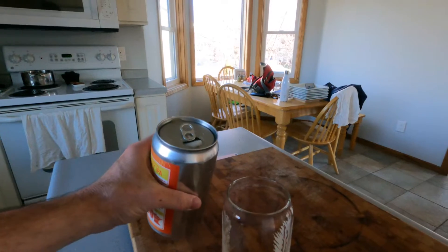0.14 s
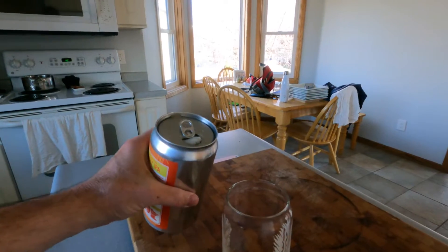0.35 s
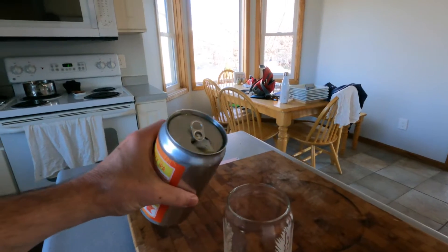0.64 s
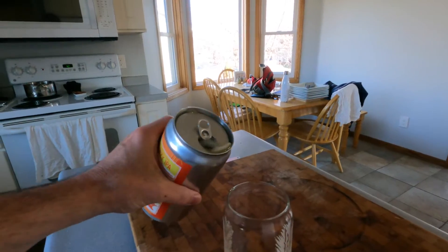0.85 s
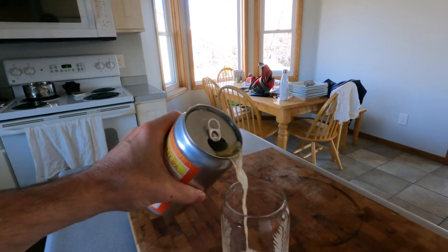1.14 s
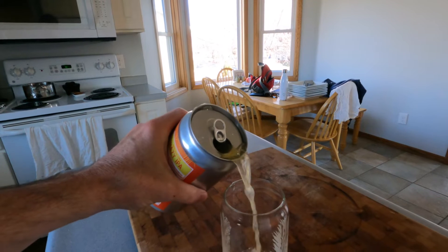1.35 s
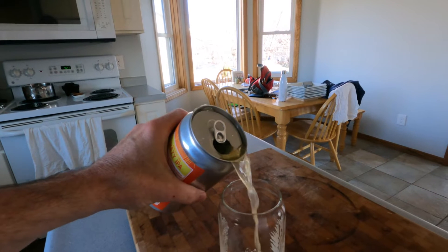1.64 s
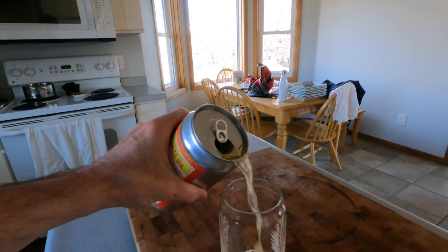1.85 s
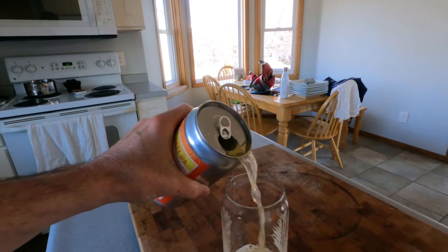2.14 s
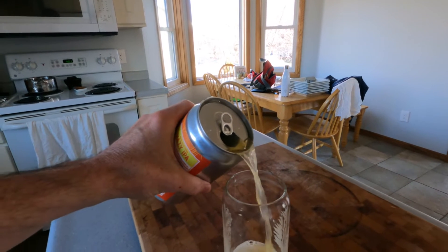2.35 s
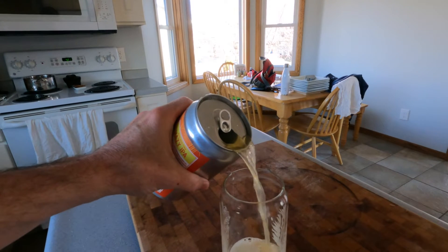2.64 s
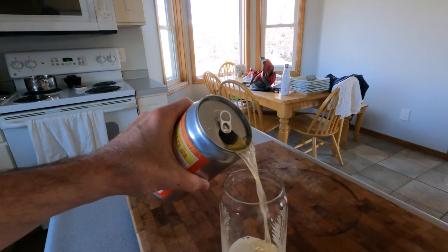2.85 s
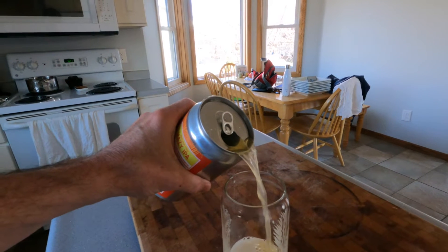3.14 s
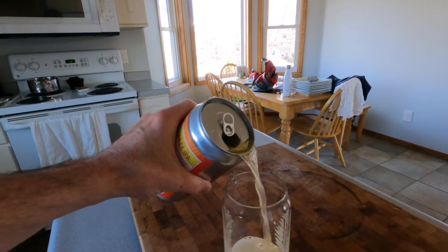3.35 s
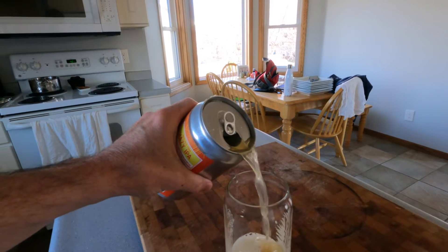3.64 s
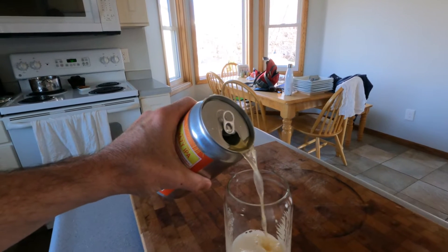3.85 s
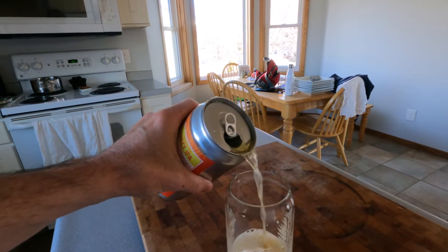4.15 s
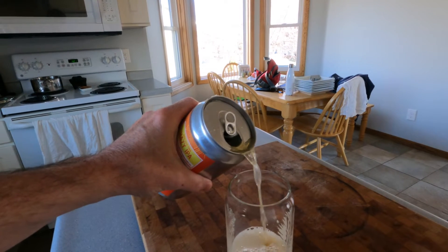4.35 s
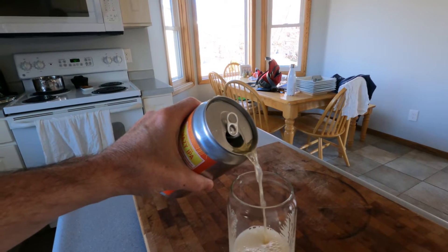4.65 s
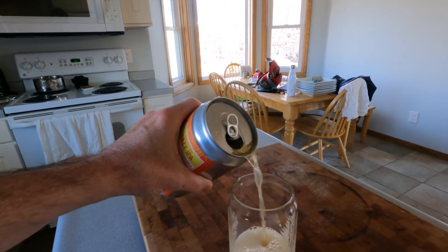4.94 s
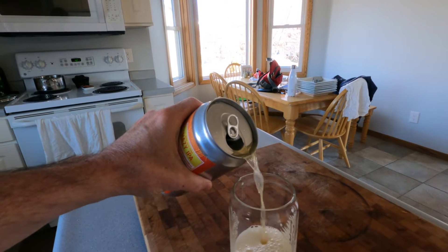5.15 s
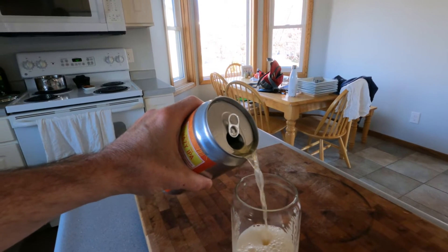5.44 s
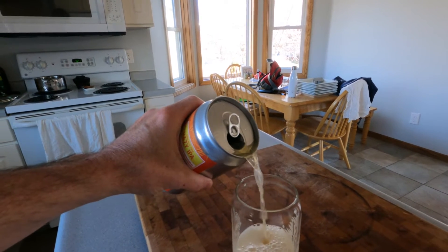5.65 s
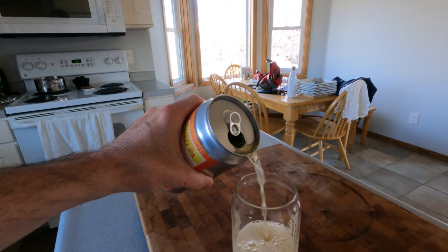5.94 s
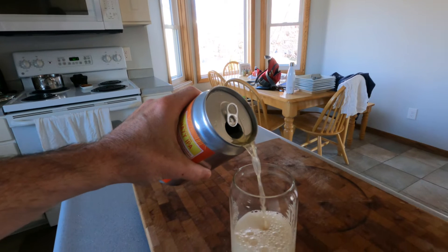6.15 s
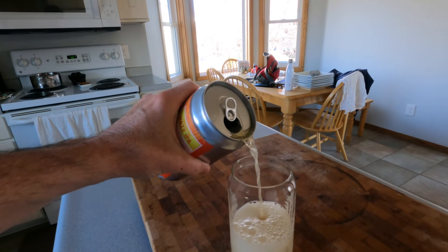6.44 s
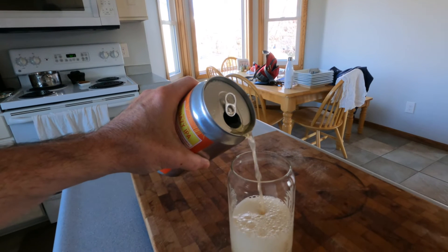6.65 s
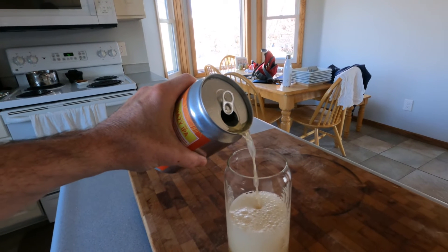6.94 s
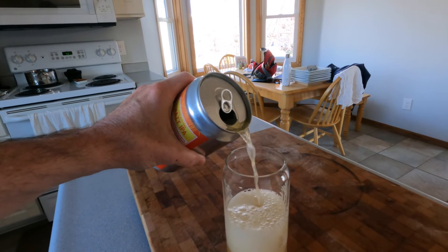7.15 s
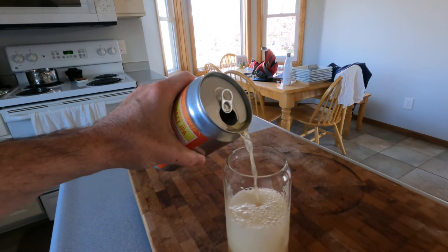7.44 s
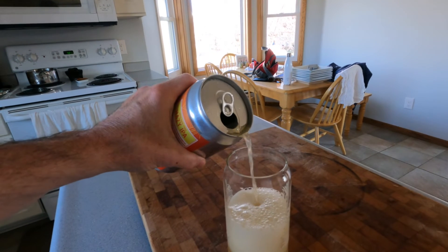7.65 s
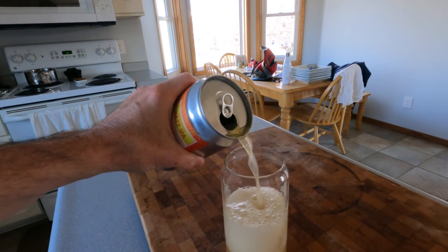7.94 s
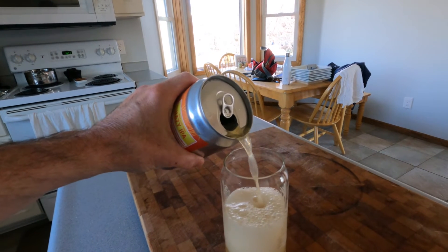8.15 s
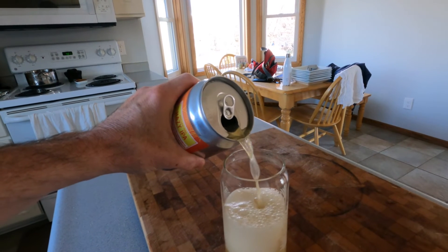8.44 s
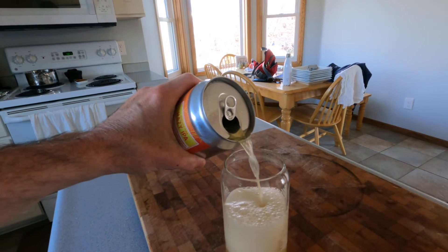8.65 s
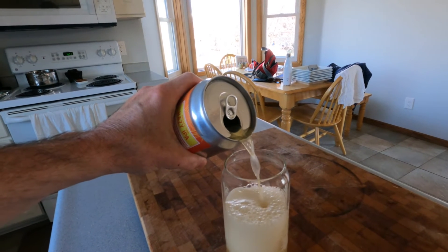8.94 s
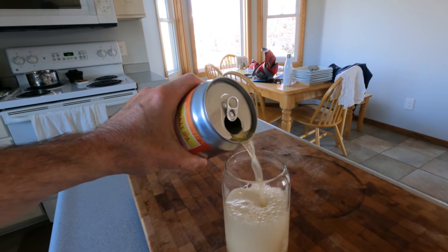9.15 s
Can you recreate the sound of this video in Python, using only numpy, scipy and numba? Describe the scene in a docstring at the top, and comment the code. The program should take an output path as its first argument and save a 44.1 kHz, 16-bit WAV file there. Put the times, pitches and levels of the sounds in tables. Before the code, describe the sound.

A quiet home kitchen, close microphone, with low wavering rumble and very faint hiss. Near 0.1 s there is a soft deep bump and a breathy wisp of hiss; at 0.3-0.65 s a thin, faint squeak glides downward. From about 1.2 s beer hits the empty glass in sharp, bright, separate splats with a glassy ring, strongest around 1.6-2.1 s. As liquid covers the bottom, the ring fades and round, hollow gulps join, dense from 2 to 3.8 s, the pool's tone sinking into a low gurgle. From 3 to 4.5 s foam grows and dulls the splashing into soft crackle and pops, while a hollow air resonance slowly rises. After 5 s it is a gentle, bubbly trickle; from 7 s it is very quiet, in sparse lumps with brief gaps near 7.9 and 8.8 s, still trickling faintly at 9.3 s. The stereo image gradually widens.

```python
"""Beer is poured from a can into a glass on a kitchen counter, close to the microphone.
Over a low room rumble come a deep bump, a soft hiss and a faint falling squeak; then splashes ring the bare glass.
Air gulps into a bubbly pool whose pitch sinks, while the shortening air column above it rises.
Foam then muffles the splash to soft pops, and the stream thins to sparse lumps.
Bubbles and gulps are damped tones, spray is decaying noise, pool and air are moving resonances fed by clicks."""
import sys
import numpy as np
from scipy import signal
from scipy.fft import rfft, irfft
from scipy.io import wavfile
from scipy.ndimage import uniform_filter1d
from numba import njit

SR = 44100
rng = np.random.default_rng(int(sys.argv[2]) if len(sys.argv) > 2 else 0)


def to_wav(sig):
    """Store sig (one row per channel, or 1-D mono) as 16-bit WAV at the path in sys.argv[1].

    Samples outside -1..1 are clipped; the rate is SR.
    """
    pcm = np.clip(np.atleast_2d(sig), -1, 1) * 32767
    pcm = np.round(pcm).astype(np.int16)
    wavfile.write(sys.argv[1], SR, pcm.T)  # frames by channels


N = 409248
TIME = np.arange(N) / SR

# force of the stream where it lands, before weighting by surface; a thick head swallows it: t/s, level/dB
POUR = [(1.15, -91), (1.25, -88), (1.5, -60), (1.62, -56.5), (2.0, -41.5), (2.4, -56), (3.0, -54),
        (3.2, -59), (3.75, -56.5), (4.05, -60.5), (4.6, -66), (6.3, -69.5), (6.84, -76.5), (6.93, -84),
        (7.02, -78.5), (7.78, -82.5), (7.86, -102), (7.95, -102), (8.02, -81.5), (8.72, -83), (8.79, -94),
        (8.88, -80.5), (9.28, -85.5)]
# lumps of beer that swell the stream, same weighting: t/s, level/dB
SURGES = [(3.27, -66), (4.4, -66.5), (5.1, -70.5), (5.831, -78), (7.075, -76.5), (7.39, -80.5),
          (7.535, -81.5), (7.7, -74), (8.16, -86), (8.427, -90), (8.681, -85.5), (9.229, -80.5)]
SURGE_S = 0.058  # a lump falls to 1/e this far from its centre
# splats of the stream on glass and open beer, before surface colour: t/s, level/dB, f/Hz, length/s
SPLATS = [(1.207, -48, 3530, 0.012), (1.225, -40, 5400, 0.013), (1.239, -22, 6240, 0.0038),
          (1.266, -31.5, 4370, 0.0055), (1.306, -25, 3680, .007), (1.33, -39, 4960, .015),
          (1.4235, -27, 6320, 0.01), (1.593, -30, 3560, 0.0055), (1.608, -20, 7200, .014),
          (1.624, -17.5, 3170, 0.0068), (1.68, -35, 4230, 0.0067), (1.694, -36, 4230, 0.0089),
          (1.737, -24, 8260, 0.015), (1.761, -24.5, 7750, 0.02), (1.807, -24.5, 3450, 0.0092),
          (1.817, -26, 4540, 0.013), (1.845, -43, 4300, 0.0097), (1.907, -24.5, 8080, .012),
          (1.946, -24, 1570, 0.011), (1.952, -27, 3280, 0.0085), (1.996, -22.5, 3040, 0.014),
          (2.063, -32, 3550, 0.0059), (2.071, -30, 1820, 0.011), (2.081, -16.5, 2600, .009),
          (2.099, -31, 2030, 0.034), (2.16, -35, 2060, 0.015), (2.225, -31, 3510, 0.011),
          (2.293, -31, 4460, 0.0099), (2.3835, -31.5, 3370, 0.012), (2.426, -60, 1870, 0.0087),
          (2.542, -33, 4370, 0.022), (2.628, -33, 3330, 0.011), (2.7, -36.5, 7460, 0.008),
          (2.701, -43, 1850, 0.0042), (2.78, -37, 4100, 0.0097), (2.814, -38.5, 1502, 0.015),
          (2.854, -33, 4330, 0.022), (2.9135, -31.5, 6350, 0.0045), (2.985, -24, 4900, 0.0066),
          (3.003, -36, 4400, 0.017), (3.018, -41, 1830, 0.0045), (3.135, -40.5, 7100, 0.0087),
          (3.286, -41, 3680, 0.0032), (3.386, -33.5, 8900, 0.0093), (3.46, -50, 3700, 0.0071),
          (3.5904, -37.5, 4300, 0.0073), (3.629, -32, 9300, 0.0031), (3.664, -31, 3550, 0.0059),
          (3.694, -29.5, 5330, 0.0097), (3.762, -27.5, 3670, 0.008), (3.898, -33, 3840, 0.0021),
          (4.274, -37.5, 4130, 0.0017)]
# pockets of air driven under: t/s, peak level/dB, f/Hz at the start of the ring
GULPS = [(1.305, -40, 3486), (1.528, -38.5, 1750), (1.593, -42.5, 1730), (1.624, -28, 1790),
         (1.724, -27, 1737), (1.741, -34.5, 1785), (1.913, -31.5, 1750), (1.987, -29, 1804),
         (2.038, -31, 1680), (2.083, -21, 1827), (2.12, -32.5, 1830), (2.18, -32.5, 963),
         (2.267, -19.5, 632), (2.298, -32, 627), (2.451, -28, 948), (2.499, -21.5, 688), (2.7, -35.5, 666),
         (2.727, -21.5, 730), (2.776, -31, 690), (2.808, -36.5, 643), (2.824, -32.5, 650),
         (2.885, -22.5, 661), (2.9125, -25.5, 637), (2.953, -34.5, 640), (3.012, -30, 630),
         (3.035, -23, 582), (3.095, -31.5, 646), (3.2385, -31.5, 610), (3.2575, -30, 590),
         (3.286, -30.5, 662), (3.318, -36.5, 624), (3.449, -30, 657), (3.469, -30.5, 670),
         (3.499, -21.5, 652), (3.561, -37.5, 353), (3.66, -30, 338), (3.699, -30, 656), (3.766, -29.5, 680),
         (3.774, -24, 325.6), (3.797, -23, 317), (3.844, -30, 688), (3.898, -32.5, 710),
         (4.012, -33.5, 301), (4.147, -28.5, 637), (4.216, -38, 720), (4.255, -35, 788),
         (4.297, -33.5, 240), (4.332, -30.5, 755), (4.3625, -39.5, 704), (4.443, -33.5, 750),
         (4.456, -41, 240), (4.777, -37, 736), (4.8, -42, 720), (4.819, -32, 240), (4.879, -31.5, 236.6),
         (5.05, -37, 744), (5.083, -36.5, 720), (5.119, -36, 225), (5.184, -37.5, 727), (5.212, -39, 224),
         (5.378, -41, 727), (5.476, -41, 233), (5.516, -35.5, 813), (5.593, -42, 226.4),
         (5.767, -42.5, 780), (5.806, -40, 806), (5.914, -41, 820), (5.972, -37.5, 844),
         (6.156, -35.5, 770), (6.212, -50, 830), (6.243, -38.5, 863), (6.313, -45, 820), (6.375, -45, 874),
         (6.579, -36, 845), (6.812, -45, 804), (6.835, -46, 900), (7.014, -49, 905), (7.065, -44.5, 900),
         (7.662, -41, 945), (7.695, -51, 985), (7.791, -46, 928), (8.118, -56, 930), (8.145, -47, 870),
         (8.17, -46.5, 890), (8.315, -52.5, 980), (8.415, -50, 920), (8.663, -60, 1046), (8.7, -59, 997),
         (8.871, -54.5, 995), (9.018, -51, 1040), (9.134, -52, 1000), (9.2135, -48, 1057),
         (9.239, -44, 985)]
# ring time nears the first value for small pockets; large, low ones add the second at the reference pitch
GULP_T60_S, GULP_RING_S, GULP_REF_HZ = 0.023, 0.022, 650
# pitch of the pool, which sinks as it deepens and fills with gas: t/s, f/Hz
POOL = [(1.5, 1800), (2.08, 1663), (2.17, 1032), (2.75, 758), (3.1, 620), (3.3, 477), (3.52, 339),
        (3.75, 324), (4.05, 311), (4.35, 254), (4.95, 241), (5.5, 223), (5.95, 158.7)]
# the largest bubbles bursting in the head, before click, spray and ring gains: t/s, level/dB
POPS = [(3.288, -33), (3.469, -30.5), (3.7983, -33), (3.9003, -29.5), (3.93, -37), (3.9569, -35),
        (3.9704, -36.5), (4.0044, -33), (4.1612, -35), (4.1819, -37.5), (4.2555, -31.5), (4.3345, -34.5),
        (4.4221, -28), (4.4425, -29.5), (4.5982, -45), (4.7142, -42), (4.762, -45), (4.8122, -44),
        (4.8192, -38), (4.925, -53), (5.021, -42), (5.0823, -45), (5.104, -43), (5.1845, -52.5),
        (5.3567, -46), (5.3792, -38), (5.4326, -42), (5.4705, -44), (5.498, -39.5), (5.5172, -41.5),
        (5.6374, -46.5), (5.688, -45), (5.7684, -41.5), (5.7928, -40), (5.8072, -39), (5.829, -34),
        (5.9727, -38), (6.0393, -42.5), (6.0686, -45), (6.1007, -42), (6.135, -42), (6.244, -41.5),
        (6.2653, -43), (6.4206, -46.5), (6.545, -44), (6.5693, -46.5), (6.7715, -49.5), (7.0606, -49),
        (7.0955, -47.5), (7.6638, -41.5), (7.6969, -43), (7.7204, -46), (7.7443, -45.5), (7.7922, -49.5),
        (9.214, -47), (9.24, -48)]
# ring of the empty glass, its air and its wall, relative to the send: f/Hz, level/dB, t60/s
GLASS = [(600, -19, .15), (990, -12, .15), (1745, 0, .21), (1870, -2, .17), (2960, 0, .16), (3200, -6, .12),
         (3470, 1, .22), (4290, -7, .12), (4610, -8, .1), (5340, -8, .13)]
# colour of the splash on bare glass, before a trim: f/Hz, level/dB
BARE = [(300, -21.5), (800, -10), (1050, 6.5), (1300, -15), (1800, -2.5), (2400, -12.5), (3300, 5),
        (3900, -8.5), (4500, 2.5), (6500, -0.5), (8100, -1.5), (9200, -24.5), (12700, -11.5), (16000, -31)]
# colour of the splash on open beer: f/Hz, level/dB
OPEN = [(250, -64), (700, 18), (1100, 20.5), (1330, 7.5), (1850, 20), (2600, 2), (3500, 4.5), (5000, 4.5),
        (6200, 2.5), (8000, 2), (9200, -11.5), (11000, -14.5), (12700, -8), (16000, -46.5)]
# colour of the splash on foam: f/Hz, level/dB
FOAM = [(250, -32.5), (500, 2.5), (1000, -14), (1350, 12), (1900, 13.5), (2550, -4), (2900, 8), (3700, 3),
        (5000, 1.5), (5900, -1), (7500, -3.5), (8700, -10), (10500, -10), (12500, -15.5), (16000, -60.5)]

# the stream lands on bare glass, then on open beer, then on foam
COVERED_S, COVERING_S = 1.897, 0.52  # beer starts to cover the bottom, and how long that takes
HEAD_S, HEAD_GROWS_S = 3.06, 1.42  # the head starts to grow, and how long that takes
FOAM_FIRST, FOAM_LAST = 0.054, 0.95  # share of the beer under foam before and after
CLOUDING_S = 0.96  # time the beer takes to cloud with gas
# the air above the beer is a quarter-wave pipe that shortens steadily from FILL_S on
AIR_M, FILL_S, RISE_M_PER_S, SOUND_M_PER_S = 0.1453, 1.97, 0.009, 343

# thin squeak that falls in pitch and dips once in level, before a gain: t/s, f/Hz, level/dB
SQUEAK = [(0.27, 3260, -105), (0.305, 3250, -90), (0.34, 3120, -77), (0.38, 2680, -93), (0.415, 2510, -69),
          (0.48, 2265, -72), (0.56, 2090, -75), (0.66, 2070, -100)]
# soft swells of hiss: t/s, level/dB, time to 1/e/s, centre f/Hz, width f/Hz
WISPS = [(0.025, -74.5, 0.52, 1190, 1400), (8.726, -79.5, 0.14, 4770, 2400)]
# level of the kitchen's low rumble, around which it wavers: t/s, level/dB
ROOM = [(0, -45.5), (0.7, -47.5), (1.12, -51), (1.24, -46), (1.42, -49), (1.75, -45.5), (2.2, -54.5),
        (4.3, -51.5), (4.95, -49), (5.35, -44.5), (6.4, -56), (7.9, -50), (8.3, -52), (9.28, -50)]
# colour of the low rumble: f/Hz, level/dB
RUMBLE = [(60, -34), (115, -23.5), (140, 2.5), (170, 0.5), (240, 0.5), (300, -5), (370, -10.5), (440, -25),
          (560, -29.5), (800, -69)]
# colour of the deep layer that carries the bumps: f/Hz, level/dB
DEEP = [(15, -4), (38, 4), (60, -7.5), (100, -7.5), (200, -29), (500, -107)]
# colour of the faint room hiss: f/Hz, level/dB
HISS = [(200, -8), (550, 3), (780, -1.5), (1100, 1.5), (1500, -2.5), (2200, -12), (3500, -17.5),
        (5200, -13.5), (7500, -16), (9000, -26.5), (12000, -53)]
# soft deep bumps as the microphone is moved: t/s, level/dB, time to 1/e/s
BUMPS = [(0.136, -47, 0.35), (1.71, -60, 0.36), (5.95, -54, 0.16)]

# colour of the opening stereo side: f/Hz, level/dB before the opening gain
WIDTH = [(50, -7), (200, -28), (480, -9), (750, -25), (1300, -12.5), (3000, -13), (7000, -2.5),
         (10000, -15.5)]
# the stereo side opens from near mono: t/s, level/dB
OPENING = [(2.05, -68), (2.6, -26), (3.4, -13.5), (4.8, -3.5), (9.28, 4.5)]
# colour of the stereo side in the top octaves, wide throughout: f/Hz, level/dB
SPARKLE = [(2500, -82.5), (4500, -40), (9500, -30), (12500, -2), (15000, 1)]
TOP_HZ = 15700  # upper edge of the recorder


def splash(bursts, bare_db=-1, glass_db=-48.0, bubble_db=1, clear_tick_db=-6,
           cluster_db=3, gas_damping=0.8, smother_db=-4):
    """Bubbles, ticks and splats, dulled as first beer and then foam covers the bottom."""
    bare, wet, foamy = surface()
    rate = 2100 * (1 - foamy) + 320 * foamy  # bubbles per second
    cluster = undb(cluster_db * walk(60))  # the stream breaks into lumps
    fizz = steady(cluster * bubbles(rate, 1100, 14000, cycles=10, spread_db=3.0), 0.15)
    ticks = steady(cluster * clicks(rate * 0.66, spread_db=8), 0.43)
    # bubbles ring in clear beer; clouded with gas they mostly tick, and foam smothers the ticks
    cloudy = ramp(COVERED_S, CLOUDING_S)
    ringing = fizz * undb(bubble_db) * (1 - gas_damping * cloudy)
    ticking = ticks * undb(clear_tick_db * (2.0 - cloudy) + smother_db * foamy)
    force = stream(bare_db=-7.5, open_db=-3.5, foam_db=3)
    drive = (ringing + ticking) * force + splats() + bursts
    out = through(drive * bare, undb(bare_db) * response(BARE)) + glass(drive, glass_db)
    out += through(drive * wet, response(OPEN))
    out += through(drive * foamy, response(FOAM))
    return out, drive


def splats(t60=0.12, spray_db=2, slap_db=5.0, cloud_db=5.5, cycles=24, rise=0.0009, scatter=0.18, count=18):
    """Each splat is a slap and a short spray, with a cloud of like-sized bubbles ringing in it."""
    out = np.zeros(N)
    for s, db, hz, length in SPLATS:
        spray = undb(spray_db) * puff(t60) + undb(slap_db) * puff(2 * length)
        onset = 1 - np.exp(-(TIME[:len(spray)] / rise) ** 2)
        add(out, s - rise, undb(db) * spray * onset)
        cloud = np.zeros(SR // 2)
        for when, detune in zip(rng.random(count), rng.standard_normal(count)):
            bubble = ping(hz * np.exp(scatter * detune), cycles / hz, rise)
            add(cloud, length * when ** 2, bubble / (1 + detune ** 2))  # crowded early, strongest in tune
        add(out, s - rise, undb(db + cloud_db) * cloud / np.linalg.norm(cloud))
    return out


def glass(x, db, vary_db=2):
    """The empty glass rings on; the landing spot wanders, so each hit favours other modes."""
    x = x * surface()[0]
    out = np.zeros(N)
    for hz, mode_db, t60 in GLASS:
        struck = x * undb(vary_db * walk(14))
        out += through(struck, undb(mode_db + db) * ping(hz, t60))
    return out


def gulps(pool_db=-9, pool_cycles=18, rise=0.0021, glide=0.22, column_db=-9, column_t60=0.038):
    """A trapped pocket of air rings at its own pitch and shakes the pool and the air above it."""
    out = np.zeros(N)
    for s, db, hz in GULPS:
        (pool_hz,), column_hz = curve(POOL, s), column_pitch(s)
        t60 = GULP_T60_S + GULP_RING_S * (GULP_REF_HZ / hz) ** 2
        y = ping(hz, t60, rise, glide)
        y += undb(pool_db) * ping(pool_hz, pool_cycles / pool_hz, rise)
        moved_air = min(column_hz / hz, 2)  # large pockets move more air
        y += undb(column_db) * moved_air * ping(column_hz, column_t60, rise)
        add(out, s, undb(db) * y / np.abs(y).max())
    return out


def gulp_spray(spray_db=-5.0, t60=0.0164):
    """Each pocket of air flicks up a little spray as it closes."""
    out = np.zeros(N)
    for s, db, _ in GULPS:
        add(out, s, undb(db + spray_db) * puff(t60))
    return out


def pool(wander=0.047, q=11, skirt_q=2.2):
    """The cloud of bubbles in the beer throbs as one soft, ringing spring; a shallow pool is shaken faster."""
    hz = curve(POOL)[0] * np.exp(wander * walk(30))
    body = cavity(clicks(0.15 * hz + 120, spread_db=4), hz, q, skirt_q)
    return steady(body, 0.097) * stream(bare_db=-13, open_db=0.5, foam_db=14)


def air_column(drive, pop_db=11, q=7.2, wander=0.038, cluster_db=1.85):
    """A dense run of plunging bubbles, and sound from the foam, ring the air above the heaving surface."""
    hz = column_pitch(TIME) * np.exp(wander * walk(40))
    plunges = steady(cavity(clicks(420, spread_db=5.0), hz, q, skirt_q=0.68), 0.1)
    plunges *= undb(cluster_db * walk(11))
    rung = cavity(drive, hz, q, skirt_q=1.6) * surface()[2]
    return plunges * stream(bare_db=-32.0, open_db=6, foam_db=11.5) + undb(pop_db) * rung


def column_pitch(t):
    """Quarter-wave pitch of the air left above the rising beer."""
    length = AIR_M - RISE_M_PER_S * np.maximum(t - FILL_S, 0)
    return SOUND_M_PER_S / 4 / length


def plinks(rate=850, cycles=26, spread_db=4.0):
    """Middling bubbles ring clearly in the shallow beer and weaken as the head covers them."""
    ringing = steady(bubbles(rate * np.ones(N), 1000, 3600, cycles, spread_db, count=8000), 0.25)
    return ringing * stream(bare_db=-13.5, open_db=-7, foam_db=-20.5)


def burble(rate=900, cycles=7, spread_db=5.5, cluster_db=2.5):
    """Under the head, damped bubbles churn in soft, uneven clusters."""
    churn = steady(bubbles(rate * np.ones(N), 900, 3100, cycles, spread_db, count=9000), 0.2)
    force = stream(bare_db=0.0, open_db=-10.0, foam_db=-8.5)
    return churn * undb(cluster_db * walk(15)) * surface()[2] * force


def prickle(rate=800, cycles=6, spread_db=7.0, cluster_db=3):
    """Small bubbles snap at the surface, each barely ringing but with a colour of its own."""
    snaps = steady(bubbles(rate * np.ones(N), 1500, 4800, cycles, spread_db, count=9000), 0.25)
    return snaps * undb(cluster_db * walk(25)) * stream(bare_db=-20, open_db=-9, foam_db=-3.5)


def pops(click_db=4.0, spray_db=2, spray_t60=0.02, rise=0.00082):
    """A foam bubble bursts: the film tears, snaps and leaves a wisp of spray."""
    out = np.zeros(N)
    for s, db in POPS:
        add(out, s, undb(db + click_db) * np.ones(1))  # one-sample snap
        add(out, s - rise, undb(db + spray_db) * puff(spray_t60))
    return out


def pop_rings(gain_db=-6, hz=3100, scatter=0.29, cycles=14, rise=0.00027, glide=25):
    """The opened bubble rings for a few cycles at its own pitch, rising as its mouth widens."""
    out = np.zeros(N)
    pitches = hz * np.exp(scatter * rng.standard_normal(len(POPS)))
    for (s, db), pitch in zip(POPS, pitches):
        add(out, s - rise, undb(db + gain_db) * ping(pitch, cycles / pitch, rise, glide))
    return out


def stream(bare_db, open_db, foam_db):
    """Force of the stream with its lumps, weighted by what it lands on."""
    bare, wet, foamy = surface()
    force = undb(curve(POUR)[0]) + sum(swell(s, db, SURGE_S) for s, db in SURGES)
    return force * undb(bare * bare_db + wet * open_db + foamy * foam_db)


def surface():
    """Shares of bare glass, open beer and foam under the stream."""
    pooled = ramp(COVERED_S, COVERING_S)
    head = FOAM_FIRST + (FOAM_LAST - FOAM_FIRST) * ramp(HEAD_S, HEAD_GROWS_S)
    foamy = pooled * np.clip(head, 0, 1)
    return 1 - pooled, pooled - foamy, foamy


def squeak(gain_db=-6, echo_db=1, t60=0.61, waver=0.0091):
    """A thin, gliding tone, blurred by the room."""
    hz, db = curve(SQUEAK)
    phase = 2 * np.pi * np.cumsum(hz * (1 + waver * walk(120))) / SR
    tone = undb(db + gain_db) * np.sin(phase)
    tone = tone * (TIME > SQUEAK[0][0]) * (TIME < SQUEAK[-1][0])
    return tone + undb(echo_db) * through(tone, puff(t60))


def wisps():
    """Narrow bands of hiss that swell and fade."""
    out = np.zeros(N)
    for s, db, length, hz, width in WISPS:
        band = cavity(rng.standard_normal(N), np.full(N, 1. * hz), hz / width, skirt_q=0.93)
        out += swell(s, db, length) * unit(band)
    return out


def kitchen(deep_db=-64, hiss_db=-75, waver_db=1.8):
    """Wavering low rumble and a few deep bumps under a faint hiss, all from coloured noise."""
    rumble, sub, hiss = (unit(through(rng.standard_normal(N), response(c))) for c in (RUMBLE, DEEP, HISS))
    low = undb(curve(ROOM)[0] + waver_db * walk(20))
    deep = undb(deep_db) + sum(swell(s, db, length) for s, db, length in BUMPS)
    return rumble * low + sub * deep + hiss * undb(hiss_db)


def bubbles(rate, lo_hz, hi_hz, cycles, spread_db, count=20000):
    """Tiny bubbles, each swelling and fading over a few cycles at its own pitch; rate (per s) may move."""
    out = np.zeros(N)
    for when, chance, pitch, ring, size in rng.random((count, 5)):
        if chance * count < rate[int(when * N)] * N / SR:
            hz = lo_hz * (hi_hz / lo_hz) ** pitch
            turns = cycles * 2 ** (2 * ring - 1) * np.sqrt(hz / lo_hz)  # small bubbles ring for more cycles
            age = hz * TIME[:int(turns * SR / hz) + 2] / turns  # 0 to 1 over its life
            gain = undb(spread_db * min(-np.log(1 - size), 4)) * hz / np.sqrt(turns)
            add(out, when * N / SR, gain * np.sin(2 * np.pi * turns * age) * age * np.exp(-8 * age))
    return out


def ping(hz, t60, rise=1e-4, glide=0, size=SR // 3):
    """A damped oscillation that swells briefly and may glide up; peak 1."""
    t = TIME[:min(int((t60 + 2 * rise) * SR) + 10, size)]
    envelope = np.exp(-np.log(1000) * t / t60) * (1 - np.exp(-(t / rise) ** 2))
    y = np.sin(2 * np.pi * hz * t * (1 + glide * t)) * envelope
    return np.pad(y / np.abs(y).max(), (0, size - len(y)))


def puff(t60, size=SR // 2):
    """Decaying noise of unit energy."""
    y = rng.standard_normal(size) * np.exp(-np.log(1000) * TIME[:size] / t60)
    return y / np.linalg.norm(y)


def clicks(rate, spread_db):
    """Random clicks of either sign, many small and a few large."""
    hit, size = rng.random(N), np.minimum(rng.exponential(size=N), 4)
    return (hit < rate / SR) * undb(spread_db * size) * rng.choice([-1, 1], N)


@njit
def resonate(x, hz, width):
    """State-variable band-pass whose centre and width move."""
    y, b, l = np.empty(len(x)), 0., 0.  # b and l: band and low states
    for i in range(len(x)):
        g, k = np.tan(np.pi * hz[i] / SR), width[i] / hz[i]
        v = (b + g * (x[i] + 1e-18 - l)) / (1 + g * (g + k))
        b, l, y[i] = 2 * v - b, l + 2 * g * v, k * v
    return y


def cavity(x, hz, q, skirt_q):
    """A moving resonance with steep skirts, from two band-passes in a row."""
    return resonate(resonate(x, hz, hz / q), hz, hz / skirt_q)


def walk(rate):
    """Random levels held 1 / rate s and slewed; spread near 1."""
    size = int(SR / rate)
    held = np.repeat(rng.standard_normal(N // size + 1), size)
    return 1.23 * uniform_filter1d(held, size)[:N]


def ramp(start_s, length_s, t=TIME):
    """Rise evenly from 0 to 1."""
    return np.clip((t - start_s) / length_s, 0, 1)


def swell(s, db, length):
    """A smooth bump of level around a time."""
    return undb(db) * np.exp(-((TIME - s) / length) ** 2)


def undb(db):
    """Decibels to gain."""
    return 10 ** (np.asarray(db) / 20)


def curve(rows, t=TIME):
    """Every column of a table, joined by straight lines in time."""
    s, *columns = np.transpose(rows)
    return [np.interp(t, s, c) for c in columns]


def unit(x):
    """Scale to rms 1."""
    return x / np.sqrt(np.mean(x ** 2))


def steady(x, seconds):
    """Hold the short-term rms near 1, keeping the grain."""
    size = int(seconds * SR / 2)
    power = uniform_filter1d(uniform_filter1d(x ** 2, size), size)
    return x / np.sqrt(np.abs(power) + 1e-12)


def add(track, s, sound):
    """Mix a sound in at a time."""
    i = int(s * SR)
    track[i:i + len(sound)] += sound[:N - i]


def response(points, size=4096):
    """Causal (minimum-phase) impulse response of a spectrum table."""
    hz, db = np.transpose(points)
    f = np.maximum(np.fft.rfftfreq(size, 1 / SR), 1)
    cepstrum = irfft(np.log(undb(np.interp(np.log(f), np.log(hz), db))))
    cepstrum[1:size // 2] *= 2
    cepstrum[size // 2 + 1:] = 0
    return irfft(np.exp(rfft(cepstrum)))


def through(x, h):
    """Pass a sound through an impulse response."""
    return signal.oaconvolve(x, h)[:N]


def tint(x, points):
    """Colour a sound by a spectrum table without shifting its phase."""
    hz, db = np.transpose(points)
    f = np.maximum(np.fft.rfftfreq(N, 1 / SR), 1)
    return irfft(rfft(x) * undb(np.interp(np.log(f), np.log(hz), db)), N)


def scene(room_db=-13, room_t60=0.61, counter_db=-12, gulp_glass_db=-56, diffuse_db=-1, lean_db=-4):
    """The pour, its reflections from counter and walls, and the stereo side that widens it."""
    crackle, drive = splash(pops() + gulp_spray())
    pockets = gulps()
    beer = crackle + pockets + glass(pockets, gulp_glass_db) + pool() + air_column(drive)
    beer += plinks() + burble() + prickle() + pop_rings()
    near = through(beer, np.pad(puff(0.16), (SR // 700, 0)))  # counter, 1/700 s later
    walls = through(beer, np.pad(puff(room_t60), (SR // 150, 0)))  # 1/150 s later
    mid = beer + undb(counter_db) * near + undb(room_db) * walls + squeak() + wisps() + kitchen()
    # the side is mid turned a quarter cycle, plus a diffuse tail
    diffuse = through(mid, np.pad(puff(0.069), (SR // 100, 0)))
    apart = signal.hilbert(mid).imag + undb(diffuse_db) * diffuse
    side = tint(apart, WIDTH) * undb(curve(OPENING)[0])
    side += tint(apart - undb(lean_db) * mid, SPARKLE)  # the top leans right
    return np.array([mid + side, mid - side])


def record(dry):
    """The recorder cuts the top with a steep low-pass."""
    return signal.sosfilt(signal.ellip(8, .2, 70, TOP_HZ, fs=SR, output="sos"), dry)


dry = scene()
out = record(dry)
to_wav(out)
```